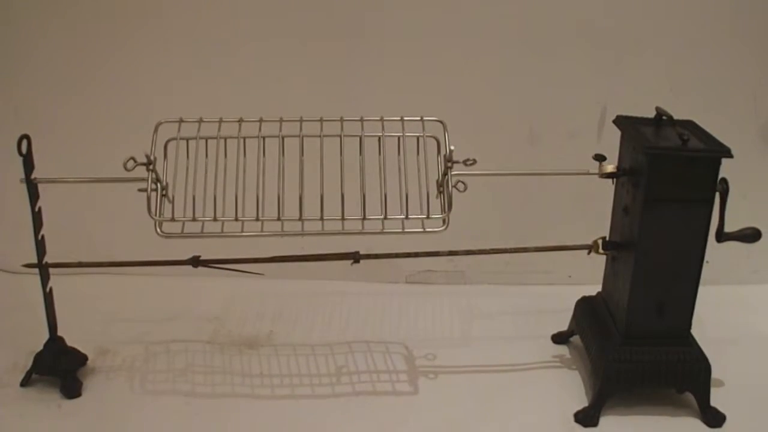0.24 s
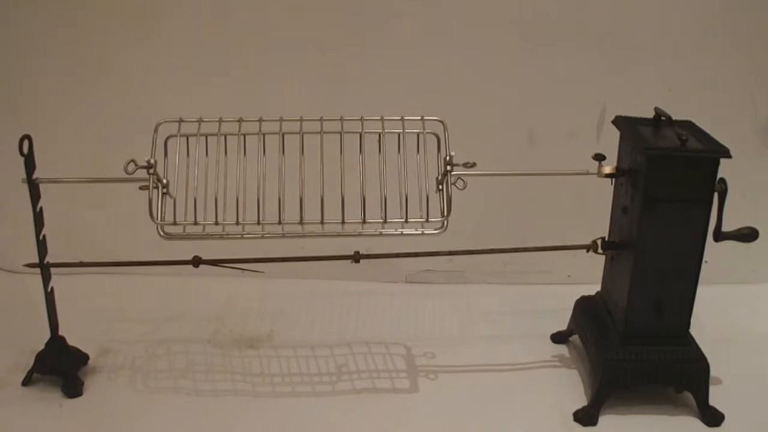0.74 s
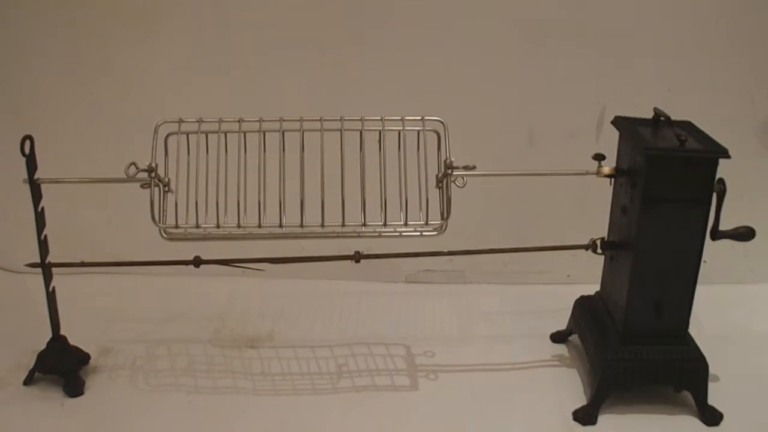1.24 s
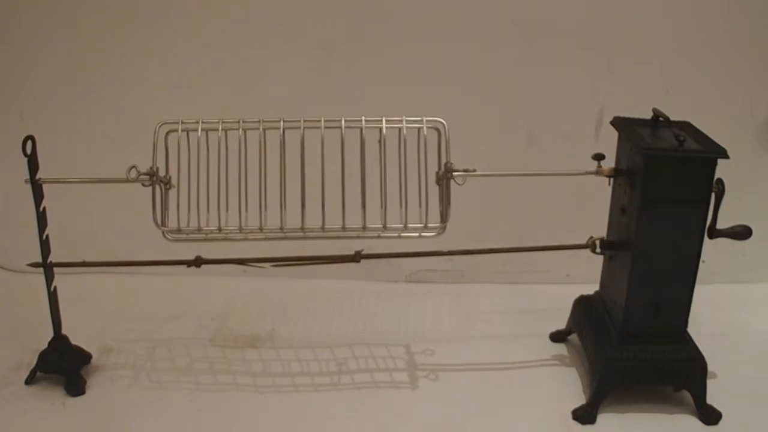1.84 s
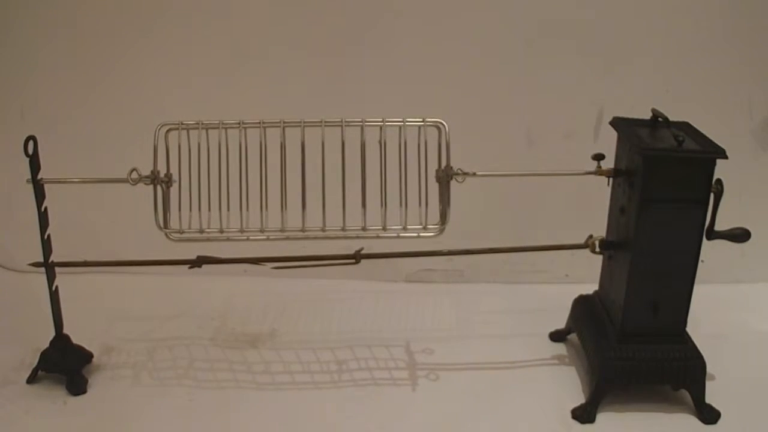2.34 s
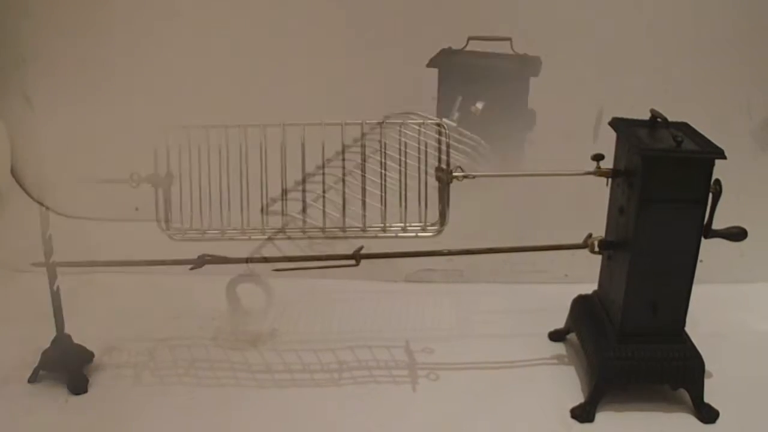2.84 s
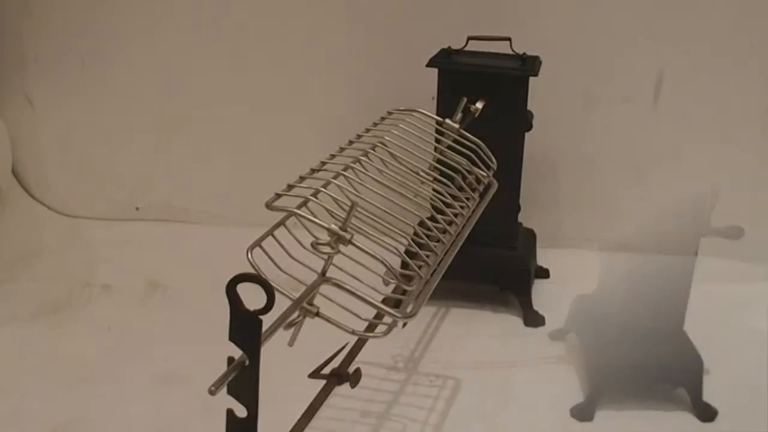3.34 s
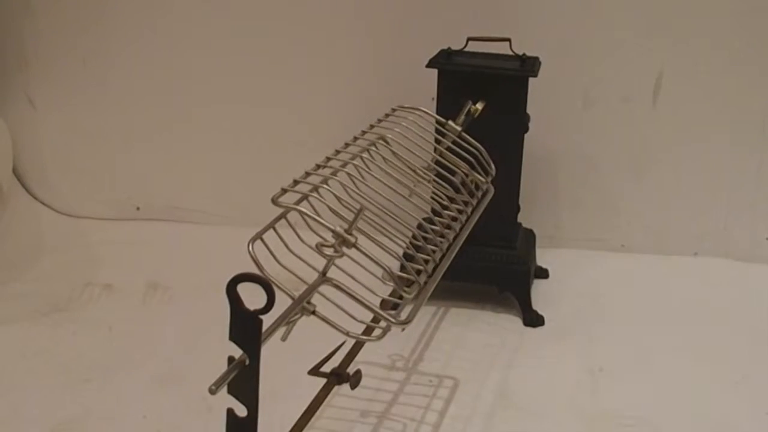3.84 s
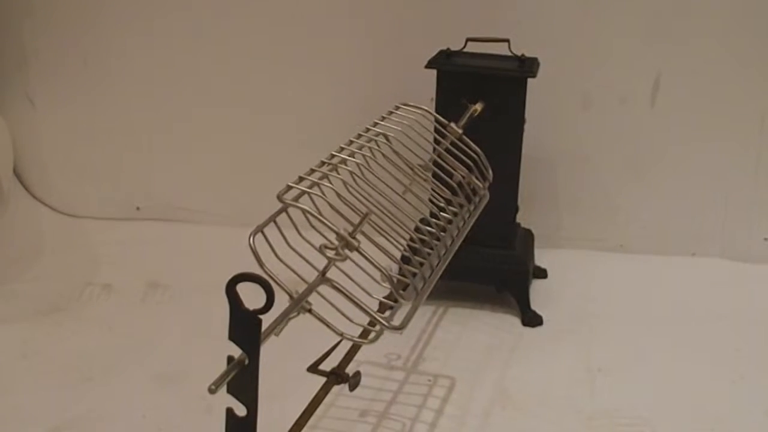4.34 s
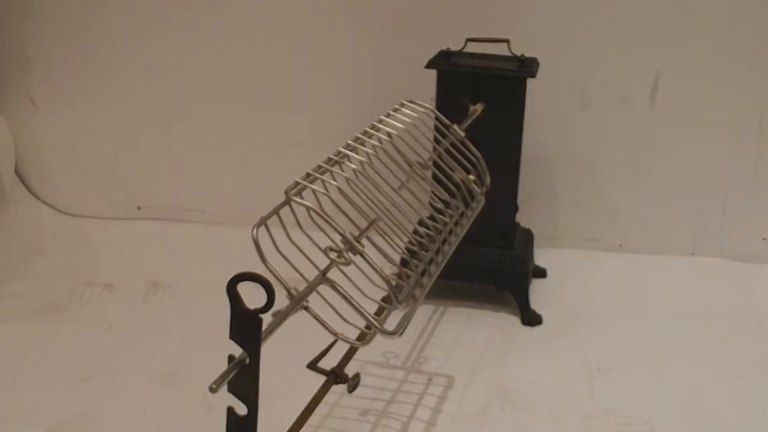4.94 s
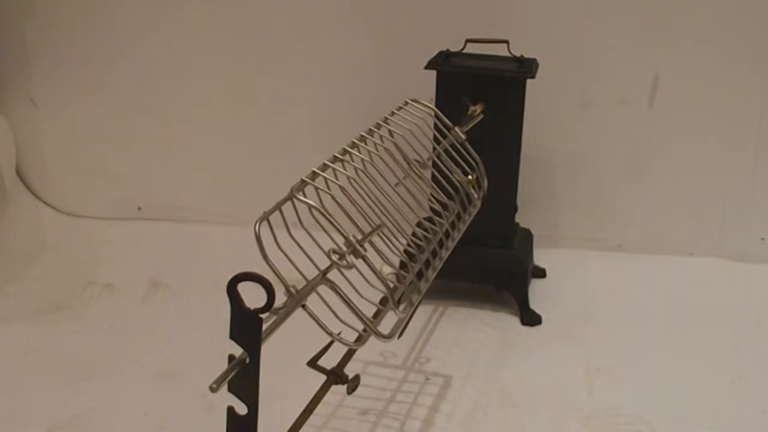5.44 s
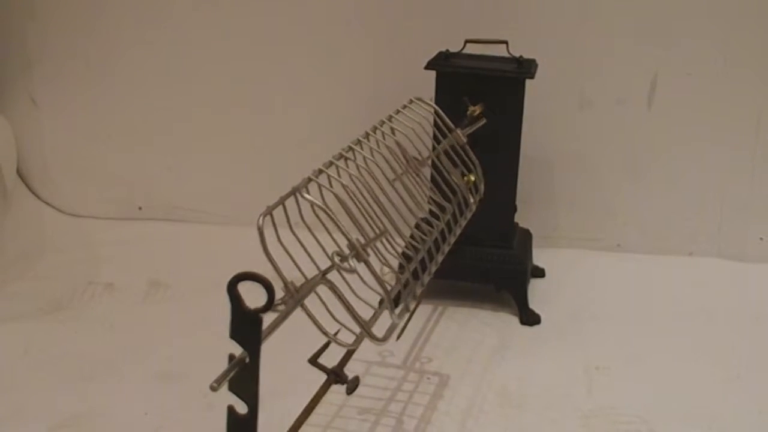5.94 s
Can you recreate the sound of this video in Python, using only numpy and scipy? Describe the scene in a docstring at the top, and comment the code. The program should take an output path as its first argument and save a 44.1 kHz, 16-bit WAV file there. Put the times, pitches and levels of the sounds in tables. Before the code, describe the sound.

An old wind-up rotisserie whirs steadily with small ticks, a cluster of sharp metal clacks midway, and a dull fading shudder.

```python
"""A spring-wound rotisserie on a table in a small room, close to a stereo microphone, heard slightly right.
From the start, gear teeth chatter through the iron housing in a pattern that repeats with the governor
shaft, over room rumble, a thin whine and hiss. The table bumps softly; from 1.4 s rough teeth catch in runs
of small ticks. Near 3 s the spit begins to slip and clack in its bearings, and the sound shifts to the
centre. Just after 4 s the spit drags and drops, a dull shudder dies away, and the gears run on."""
import sys
import numpy as np
from scipy import signal
from scipy.fft import rfft, irfft
from scipy.io import wavfile
from scipy.ndimage import uniform_filter1d, minimum_filter1d, map_coordinates

SR = 44100
rng = np.random.default_rng(int(sys.argv[2]) if len(sys.argv) > 2 else 0)


def output_pcm(signal):
    """Save a mono or channel-first signal as 16-bit PCM at the path in sys.argv[1].

    Samples are clipped to [-1, 1] before scaling.
    """
    pcm = np.clip(np.atleast_2d(signal).T, -1, 1) * 32767
    wavfile.write(sys.argv[1], SR, np.round(pcm).astype(np.int16))


N = 273861
T = np.arange(N) / SR
F = np.maximum(np.arange(N // 2 + 1) * SR / N, 1)

# Load on the gear train, heard as the level of its whirr. Each row: time in seconds, level in dB.
GEAR_LOAD = [(0.0, -44), (0.53, -43.5), (0.74, -43.5), (1.24, -43), (1.92, -43.5), (3.04, -39.5),
             (3.53, -40.5), (4.12, -45), (5.26, -44), (6.21, -44)]
# Resonances of the iron housing. Each row: centre in Hz, width in Hz, gain in dB.
HOUSING_MODES = [(1091, 96, -8), (1238, 70, -1.5), (1396, 120, -4), (1645, 106, 1), (1882, 98, 2),
                 (2032, 122, 0), (2370, 180, -15), (2604, 84, -3), (2805, 134, -5.5), (3073, 256, -5.5),
                 (3406, 260, -5.5), (3924, 172, -6), (4450, 450, -16), (4900, 280, -14.5),
                 (5820, 620, -21.5), (7110, 980, -19.5), (8380, 350, -23), (8970, 320, -19),
                 (9910, 410, -21.5)]
# The housing's broad radiation between resonances. Each row: frequency in Hz, gain in dB.
PANEL_COLOUR = [(60, -36), (200, -18.5), (300, -14), (650, -19), (900, -15), (1500, -12.5), (4500, -23),
                (6000, -30.5), (10500, -29.5), (15500, -34.5)]
# Partials of the thin whine. Each row: frequency in Hz, rms level in dB.
WHINE_PARTIALS = [(226, -67.5), (2005, -62.5), (2808, -60.5), (5615, -78), (8021, -75), (8823, -84),
                  (11364, -95)]
# Rumble of the room's air. Each row: frequency in Hz, gain in dB.
AIR_COLOUR = [(10, -15), (29, -4.5), (40, -1.5), (60, -10), (87, -6.5), (115, -13), (160, -14), (400, -17),
              (1000, -25.5), (15000, -38.5)]
# Soft bumps in the table top. Each row: start in seconds, level in dB, seconds to fall 60 dB.
TABLE_BUMPS = [(.70, -47.5, 0.14), (1.001, -51, 0.072), (1.77, -50, .1), (3.236, -48, 0.098),
               (3.74, -52, 0.21), (4.245, -52, .2)]
# Runs along the rough teeth. Each row: start in seconds, gain in dB, length in seconds (0 for one tooth).
CATCH_RUNS = [(1.377, .7, .45), (1.874, -1, 0), (1.992, -1.5, 0), (2.863, 1.5, .25), (3.102, -1.5, 0),
              (3.419, -1, 0), (3.548, -1, .45), (4.527, .5, .6), (5.508, 1, .25), (5.803, 1, 0),
              (5.866, -3, 0), (5.936, -2, 0), (5.997, -3, 0)]
# The rough teeth, always in this rhythm. Each row: delay into the run in seconds, level in dB,
# then treble tick and table thump in dB against the tooth's ring.
CATCH_RHYTHM = [(0, -38.5, -11.5, -12.5), (.101, -36.5, -12, -18), (.193, -40, -15.5, -14.5),
                (.316, -38, -11.5, -15), (.397, -37.5, -10, -8), (.517, -39.5, -15, -21)]
# Resonances of a caught tooth. Each row: centre in Hz, width in Hz, gain in dB.
TOOTH_MODES = [(1057, 230, -5.5), (2130, 310, -1.5), (2820, 260, 2), (3445, 360, 0.5), (4140, 850, -6)]
# Blows of the spit on its bearing. Each row: time in seconds, level in dB, centre of the ring in Hz,
# accented frequency in Hz, its lift in dB, crack and thud in dB against the ring, slip rise in seconds.
SPIT_BLOWS = [(2.8718, -21.5, 1850, 1240, 8, -25, -38, .0008), (2.906, -29, 3100, 3200, 4, -18, -42, .0014),
              (2.987, -34.5, 1500, 1400, 5, -26, -25, .0003),
              (3.1465, -15.5, 1850, 1600, 6, -14.5, -20, .0001),
              (3.2233, -8, 2200, 3620, 11, -21.5, -24, .0001),
              (3.7096, -23, 2000, 1900, 7, -36, -20, .0008), (3.7307, -17, 1150, 1400, 6, -28, -10, .0001),
              (3.808, -15.5, 1900, 2740, 11, -15.5, -15, .0012),
              (4.160, -31, 2250, 2450, 3, -25, -18, .0007), (4.172, -36, 2200, 2740, 4, -23, -22, .002),
              (4.1976, -10, 1700, 2090, 6, -23, -21, .0016), (4.382, -36, 1400, 1780, 6, -30, -20, .0003)]
# Modes of spit and bearing. Each row: frequency in Hz, gain in dB, seconds to fall 60 dB.
SPIT_MODES = [(572, -7.5, 0.018), (800, -17, 0.035), (972, -8.5, 0.033), (1180, -4.5, 0.045),
              (1400, -13, 0.039), (1600, -0.5, 0.027), (1780, 2.5, .022), (1953, 3, 0.02), (2090, 4, 0.025),
              (2450, 1.5, 0.016), (2740, -3.5, 0.02), (3200, 1.5, 0.011), (3620, -6, 0.017)]
# The broad knock in a clack. Each row: frequency in Hz, gain in dB.
KNOCK_COLOUR = [(60, -31), (150, -20), (500, -40), (900, 0), (1800, 6), (3100, 5), (4300, -11.5),
                (6000, -23), (10000, -25), (15500, -28)]
# The table's thud under a blow. Each row: frequency in Hz, gain in dB.
THUD_COLOUR = [(30, -9), (80, -7), (150, -1.5), (210, -4.5), (300, -3), (480, 1), (750, 1.5), (1100, 8.5),
               (2000, -20), (15000, -62)]
# The dull shudder. One row: start in seconds, starting level of its tail in dB, seconds to fall 60 dB.
SHUDDER_EVENT = (4.381, -37.5, 0.97)
# The shudder's rattle. Each row: frequency in Hz, gain in dB.
RATTLE_COLOUR = [(100, -19), (250, -3), (450, -2), (700, -15), (1050, 3), (1500, -7), (2200, -2.5),
                 (3300, -12), (5000, -22), (15000, -36)]


def undb(db):
    """Decibels to gain."""
    return 10 ** (np.asarray(db) / 20)


def level(x, db):
    """Scale to an rms level."""
    return x * undb(db) / np.sqrt(np.mean(x ** 2))


def burst_level(x, db):
    """Scale a short sound so that its energy, packed into 10 ms, has this rms level."""
    return x * undb(db) / np.sqrt(np.sum(x ** 2) / (SR / 100))


def slope(points):
    """Gain against frequency through (Hz, dB) points."""
    hz, db = np.transpose(points)
    return undb(np.interp(np.log(F), np.log(hz), db))


def peaks(rows):
    """Gain against frequency of steep (Hz, width in Hz, dB) resonances."""
    return np.sqrt(sum(undb(db) ** 2 / (1 + ((F - hz) / width * 2) ** 4) for hz, width, db in rows))


def response(gain, size=2048):
    """Minimum-phase impulse response with that gain."""
    log_gain = np.log(np.interp(np.arange(size + 1) * SR / (2 * size), F, gain) + 1e-6)
    cepstrum = irfft(log_gain)[:size]
    cepstrum[1:] *= 2
    return irfft(np.exp(rfft(cepstrum, 2 * size)))[:size]


def through(x, ring):
    """Pass a sound through an impulse response."""
    return signal.fftconvolve(x, ring)[:len(x)]


def noise(size=N):
    """White noise."""
    return rng.standard_normal(size)


def walk(rate_hz):
    """A smooth random wander with a spread near 1."""
    knots = noise(int(rate_hz * N / SR) + 2)
    return np.interp(T * rate_hz, np.arange(len(knots)), knots)


def add(out, sound, start_s):
    """Mix a short sound in at its start time."""
    start = int(start_s * SR)
    out[start:start + len(sound)] += sound[:N - start]


def gears(load_db, shaft_hz=10.26, teeth=60, pattern_db=1.22, scatter_db=0.5, wobble_db=1.06):
    """Each tooth strikes, then rubs, ringing the housing; uneven teeth and a flutter repeat every turn."""
    turns = np.cumsum(shaft_hz * (1 + .008 * walk(2))) / SR
    mesh = turns * teeth
    tooth = mesh.astype(int)
    flutter_db = 1.3 * np.sin(2 * np.pi * 5 * turns)  # five beats a turn
    force = undb(pattern_db * noise(teeth)[tooth % teeth] + scatter_db * noise()[tooth] + flutter_db)
    strikes = np.diff(tooth, prepend=0) * np.sign(noise())  # backlash: either flank may hit
    rubbing = noise() * np.exp(-(mesh % 1) / 0.65)
    drive = force * (level(strikes, -7) + level(rubbing, -1)) * undb(wobble_db * walk(14))
    housing = response(np.hypot(peaks(HOUSING_MODES), slope(PANEL_COLOUR)))
    whirr = level(through(drive, housing), 0.03)
    treble = signal.sosfilt(signal.butter(1, 3000, "high", fs=SR, output="sos"), whirr)
    return (whirr + (undb(1) - 1) * treble) * undb(load_db)  # treble lifted 1 dB


def walls(x, wet_db=-27, t60=0.17):
    """The small room's walls return a weak, short tail to the close microphone."""
    t = np.arange(SR // 3) / SR
    tail = noise(len(t)) * undb(-60 * t / t60) * (t > .006)
    return through(x, tail / np.linalg.norm(tail)) * undb(wet_db)


def room_tone(strain_db, rumble_db=-59, drone_hz=28.5, drone_db=-61):
    """A faintly wavering whine, a low rumble that swells with the load, and a deep drone in it."""
    whine = np.zeros(N)
    for hz, db in WHINE_PARTIALS:
        amplitude = np.sqrt(2) * undb(db + 0.86 * walk(3.98))
        whine += amplitude * np.sin(2 * np.pi * hz * T + .5 * walk(3.2))
    air = through(noise(), response(slope(AIR_COLOUR), size=16384))
    rumble = level(air, rumble_db) * undb(1.1 * strain_db)
    drone = level(np.sin(2 * np.pi * drone_hz * T + 0.54 * walk(3.14)), drone_db)
    return whine + rumble + drone


def table_bumps(centre_hz=120, width_hz=90):
    """Soft bumps boom in one low resonance of the table top."""
    out, t = np.zeros(N), np.arange(SR // 4) / SR
    table = response(peaks([(centre_hz, width_hz, 0)]))
    for start_s, db, t60 in TABLE_BUMPS:
        push = noise(len(t)) * undb(-60 * t / t60)
        add(out, burst_level(through(push, table), db), start_s)
    return out


def scrape(t, rise_s, fall_s):
    """Friction noise that swells up to t = 0 and dies after it."""
    return noise(len(t)) * np.exp(np.minimum(t / max(rise_s, 1e-5), -t / fall_s))


def tooth_catches(rise_s=0.0018, fall_s=0.0027, bind_s=0.011, thump_hz=295, thump_s=0.011):
    """Rough teeth bind, grind and let go in turn: each a gritty tick with a soft thump in the table."""
    out, t = np.zeros(N), np.arange(-1536, 3072) / SR
    age = np.maximum(t, 0)
    tooth = response(peaks(TOOTH_MODES))
    treble = response(peaks([(8150, 1050, 3), (8600, 5000, -14)]))
    for start_s, run_db, length_s in CATCH_RUNS:
        for delay_s, db, tick_db, thump_db in CATCH_RHYTHM:
            grit = scrape(t, rise_s, fall_s) + 0.37 * scrape(t, bind_s, fall_s)
            ring = burst_level(through(grit, tooth), 0)
            tick = burst_level(through(grit, treble), tick_db)
            hz = thump_hz * (1 + 0.11 * rng.standard_normal())
            thump = burst_level(np.sin(2 * np.pi * hz * age) * np.exp(-age / thump_s), thump_db)
            if delay_s <= length_s:
                add(out, (ring + tick + thump) * undb(run_db + db), start_s + delay_s + t[0])
    return out


def contact_db(hz, centre_hz, blow_db, thud_db, full_blow_db=-8.5, usual_thud_db=-19):
    """A blow drives most near its centre, and the lows only as far as it reaches the table."""
    focus_db = 3 + 0.3 * (full_blow_db - blow_db)  # softer blows ring more narrowly
    lows_db = .55 * (thud_db - usual_thud_db) * (hz < 1000)
    return lows_db - focus_db * np.log2(hz / centre_hz) ** 2


def spit_clacks(accent_width_hz=130, onset_s=0.00034, knock_s=0.0023, crack_s=0.00093, thud_s=0.0058):
    """The spit slips and drops against its bearing; the point of contact favours some modes."""
    out, t = np.zeros(N), np.arange(-512, 4096) / SR
    age = t - t[0]
    thud = response(slope(THUD_COLOUR))
    crack = response(peaks([(8220, 1660, 3.5), (8800, 8600, -13.5)]))
    hz, mode_db, t60 = np.transpose(SPIT_MODES)[:, :, None]
    onset = 1 - np.exp(-(age / onset_s) ** 2)  # bending waves need a moment to fill the iron
    for time_s, db, centre_hz, accent_hz, accent_db, crack_db, thud_db, slip_s in SPIT_BLOWS:
        knock = response(slope(KNOCK_COLOUR) * undb(.6 * contact_db(F, centre_hz, db, thud_db)))
        cycles = hz * (1 + .012 * noise(hz.shape)) * age + rng.random(hz.shape)  # modes start out of step
        lift_db = accent_db * np.exp(-((hz - accent_hz) / accent_width_hz) ** 2)
        envelopes = undb(mode_db + lift_db + contact_db(hz, centre_hz, db, thud_db) - 60 * age / t60)
        ring = np.sum(envelopes * np.sin(2 * np.pi * cycles), axis=0) * onset
        blow = (t == 0) + 0.022 * scrape(t, slip_s, fall_s=.002)  # one impact with a little chatter
        clack = burst_level(through(blow, ring), 0)
        noisy_parts = (knock, knock_s, -7), (crack, crack_s, crack_db), (thud, thud_s, thud_db)
        for colour, fall_s, part_db in noisy_parts:
            clack += burst_level(through(scrape(t, slip_s, fall_s), colour), part_db)
        add(out, burst_level(clack, db), time_s + t[0])
    return out


def spit_drag(peak_s=4.066, peak_db=-39.5, rise_s=.014, fall_s=.1):
    """The spit rubs in its bearing before it drops: a short swell of friction that eases off."""
    bearing = response(peaks([(2200, 2400, 0)]) ** 2)
    rub = level(through(noise(), bearing), peak_db)
    return rub * np.exp(np.minimum((T - peak_s) / rise_s, (peak_s - T) / fall_s))


def shudder(onset_db=5, onset_s=.006, grain_db=2.5, grain_hz=220):
    """A dull bump with a grainy, rattling tail."""
    start_s, db, t60 = SHUDDER_EVENT
    age = np.maximum(T - start_s, 0)
    grains = noise() * undb(grain_db * walk(grain_hz))
    rattle = level(through(grains, response(slope(RATTLE_COLOUR))), db)
    return rattle * (T > start_s) * undb(onset_db * np.exp(-age / onset_s) - 60 * age / t60)


def scene(shift_start_s=3.08, shift_length_s=0.73, left_lag_ms=.021, hiss_db=-69, wide_hiss_db=-78):
    """Close up at the table: the sound shifts from slightly right to the centre as the left lag closes."""
    load_db = np.interp(T, *np.transpose(GEAR_LOAD))
    strain_db = load_db - load_db.mean()
    centred = np.clip((T - shift_start_s) / shift_length_s, 0, 1)  # 0 slightly right, 1 in the centre
    machine = gears(load_db) + tooth_catches() + spit_clacks() + spit_drag() + shudder() + table_bumps()
    hiss = noise() * undb(hiss_db + 2.5 * strain_db + 2.5 * centred)
    right = machine + walls(machine) + room_tone(strain_db) + hiss
    lag_samples = left_lag_ms * (1 - centred) * SR / 1000
    left = map_coordinates(right, [np.arange(N) - lag_samples], order=5, mode="nearest")
    # a faint, wide treble hiss that fades out between 3 and 4 s
    wide_hiss = level(np.diff(noise(), prepend=0) * (1 - centred), wide_hiss_db)
    return np.array([left + wide_hiss, right - wide_hiss])


def record(dry):
    """Behind the microphone, a fast limiter holds peaks to full scale; the top is cut at 15.9 kHz."""
    gain = 1 / np.maximum(np.abs(dry).max(axis=0), 1)
    gain = uniform_filter1d(minimum_filter1d(gain, size=25), size=25)
    return signal.sosfilt(signal.ellip(10, .2, 70, 15900, fs=SR, output="sos"), dry * gain)


dry = scene()
out = record(dry)
output_pcm(out)
```